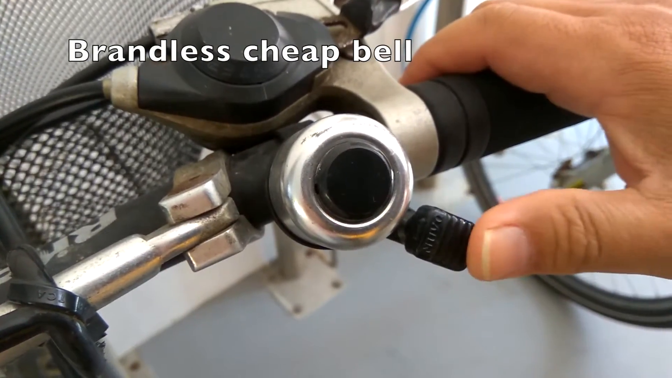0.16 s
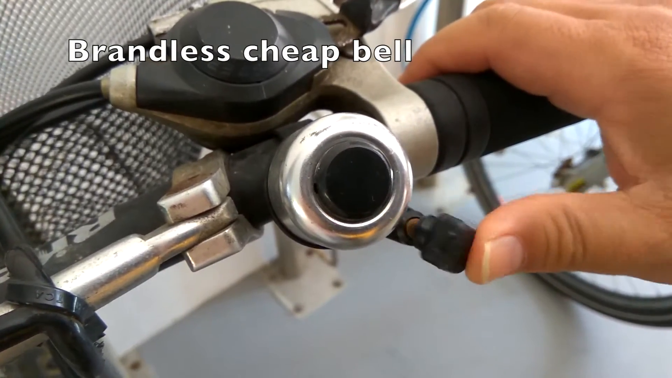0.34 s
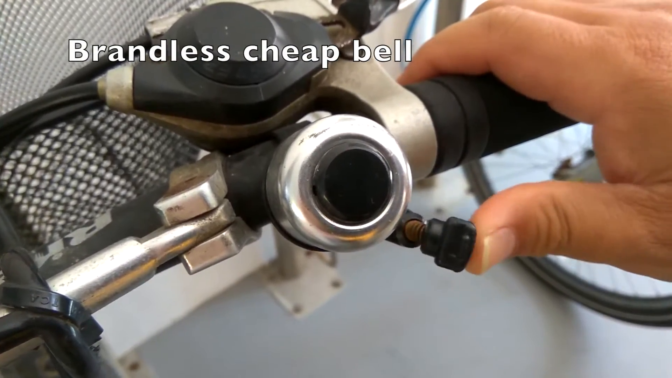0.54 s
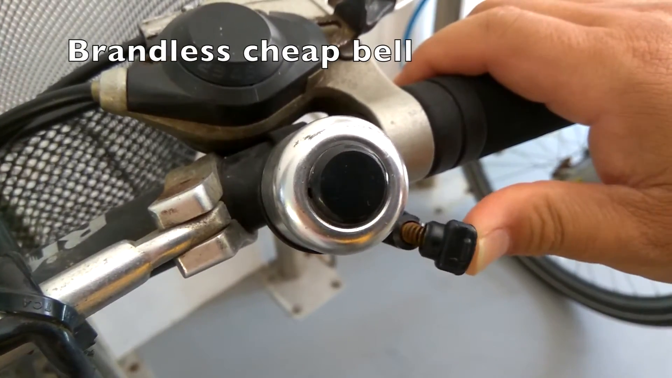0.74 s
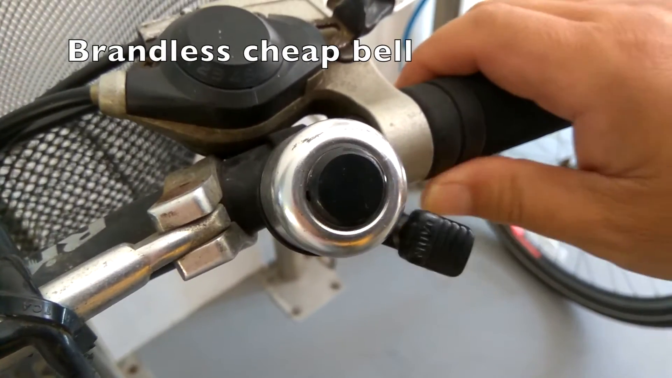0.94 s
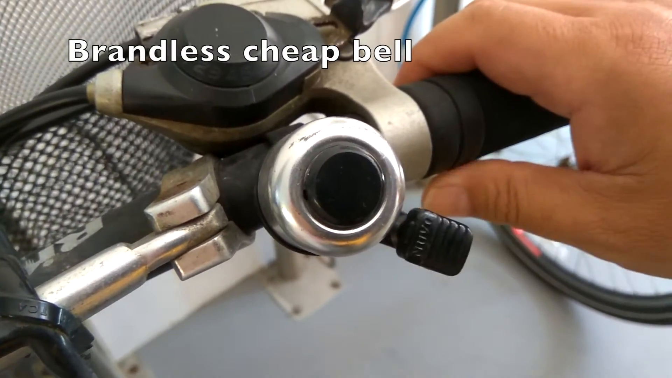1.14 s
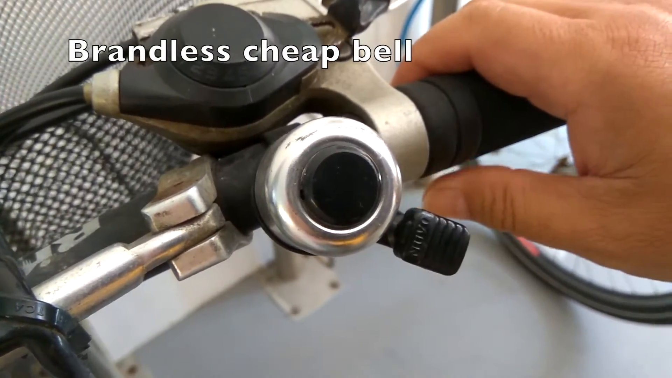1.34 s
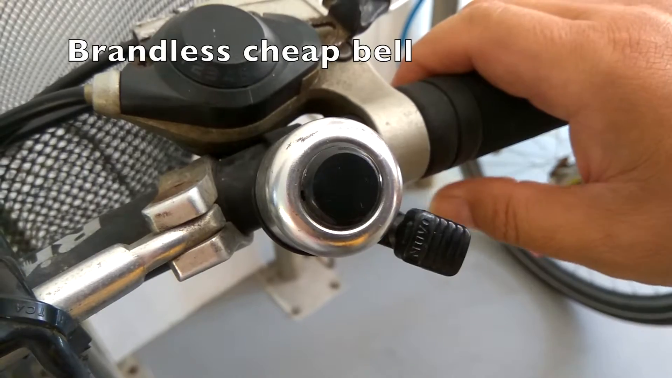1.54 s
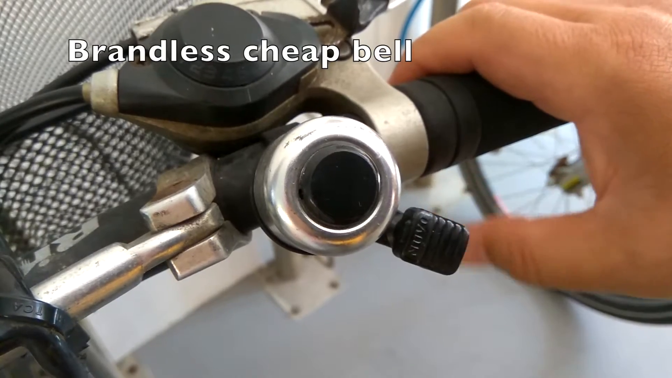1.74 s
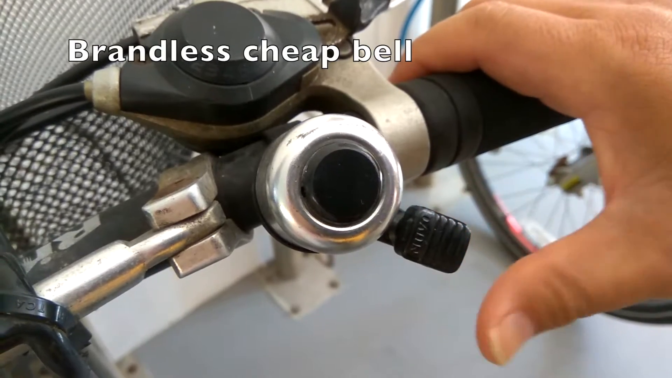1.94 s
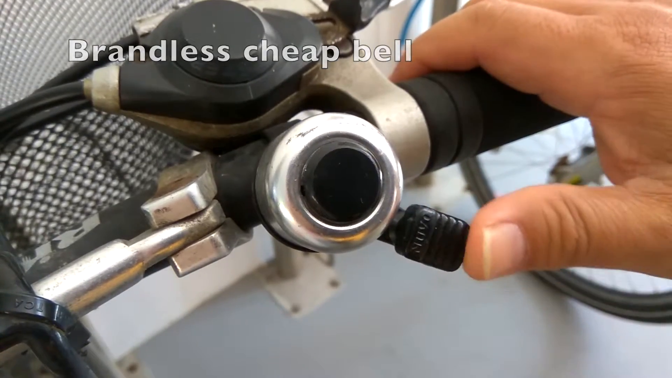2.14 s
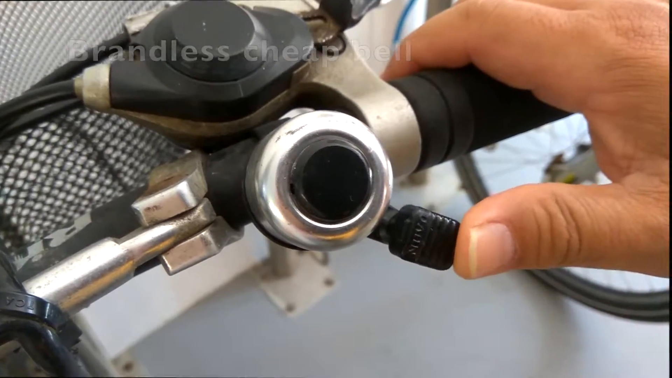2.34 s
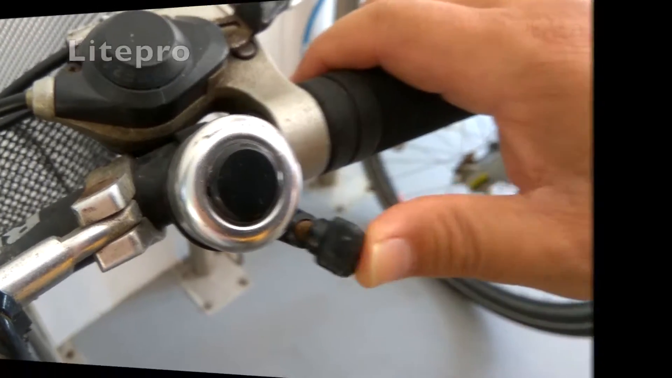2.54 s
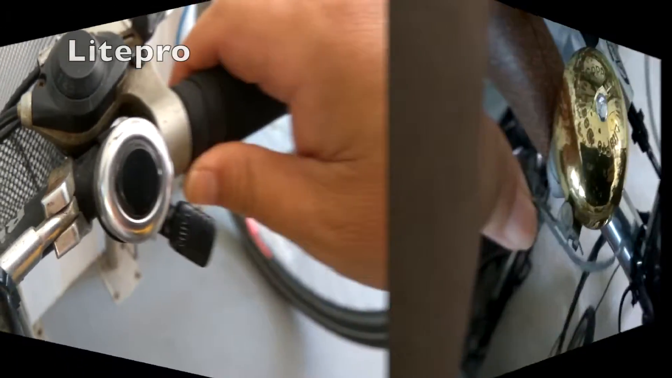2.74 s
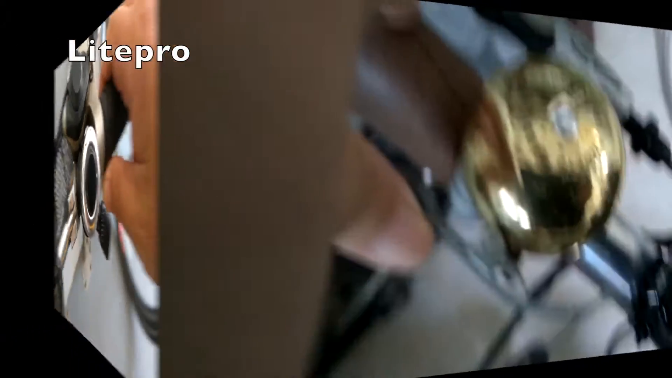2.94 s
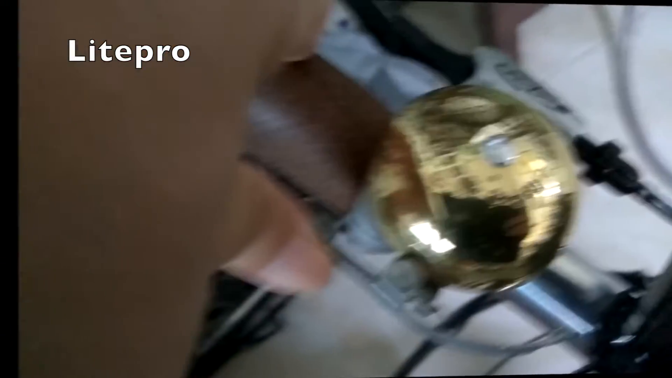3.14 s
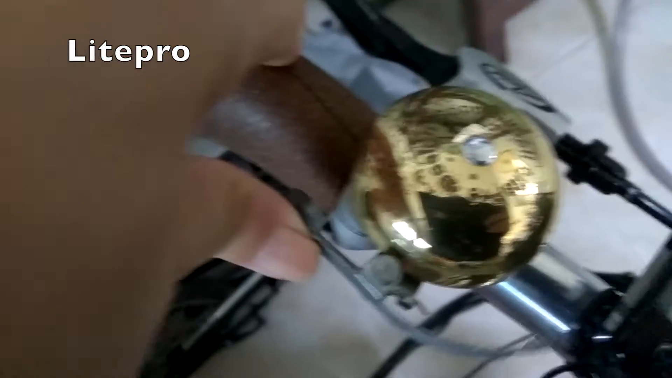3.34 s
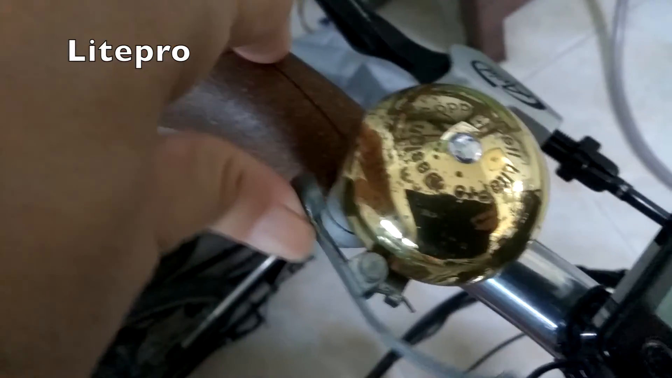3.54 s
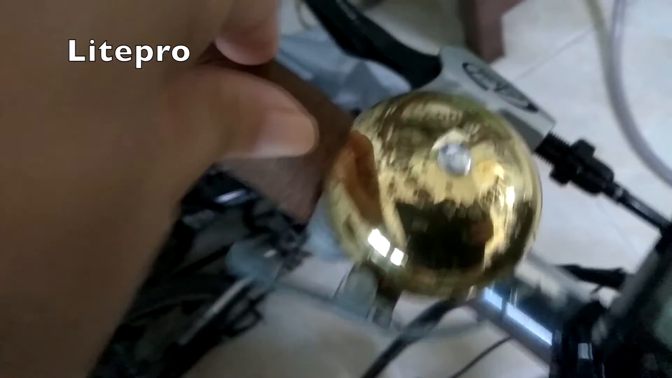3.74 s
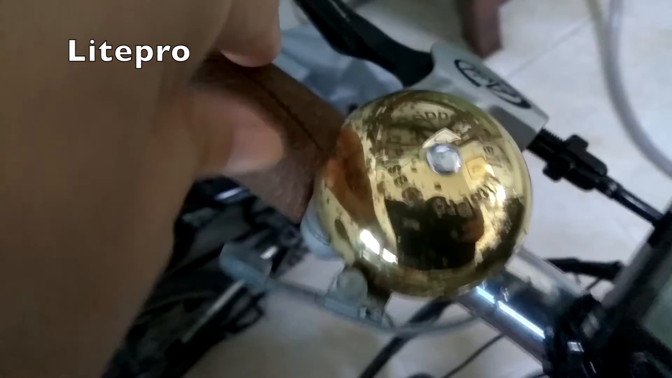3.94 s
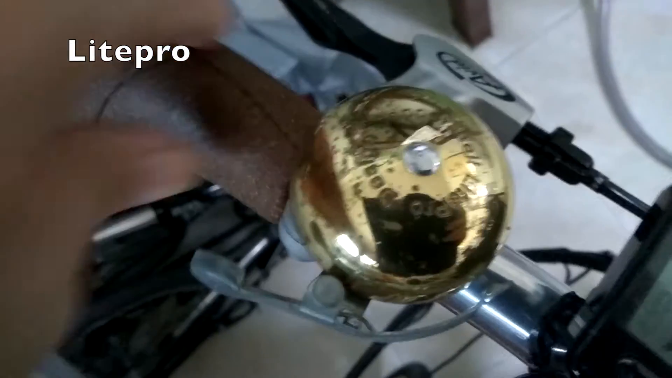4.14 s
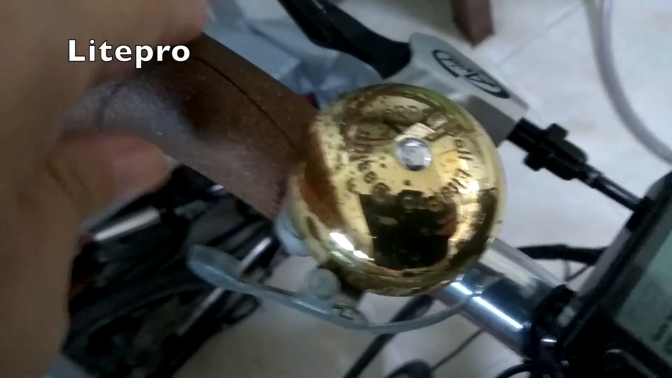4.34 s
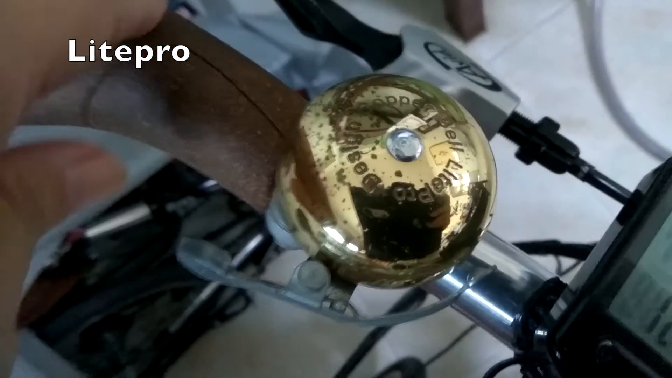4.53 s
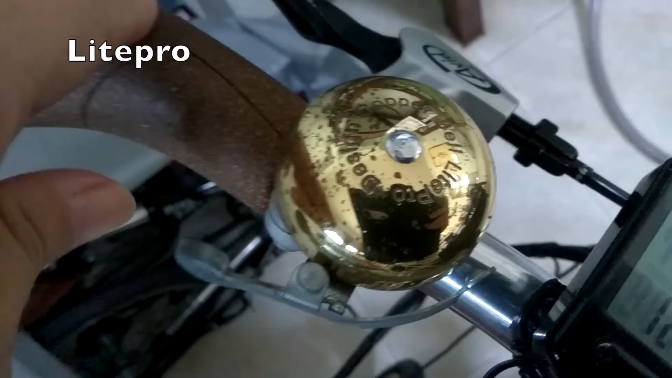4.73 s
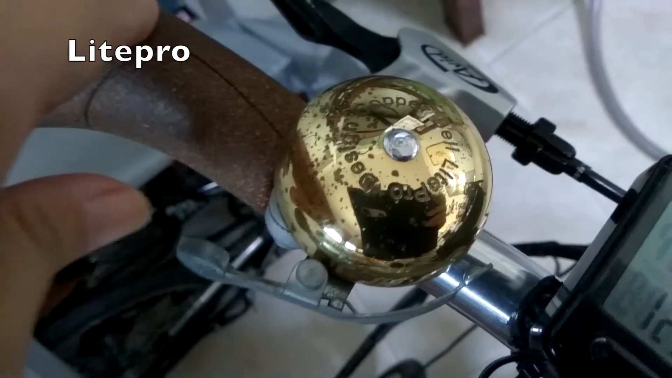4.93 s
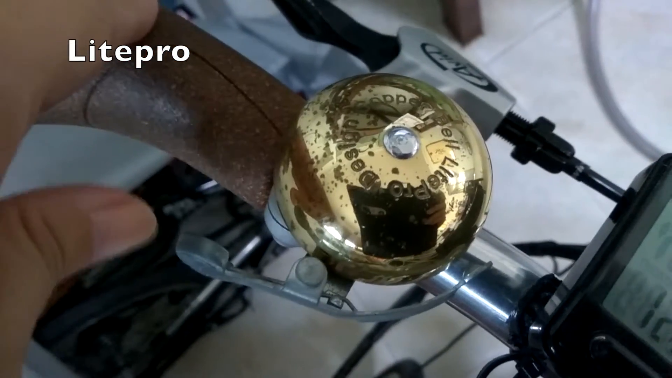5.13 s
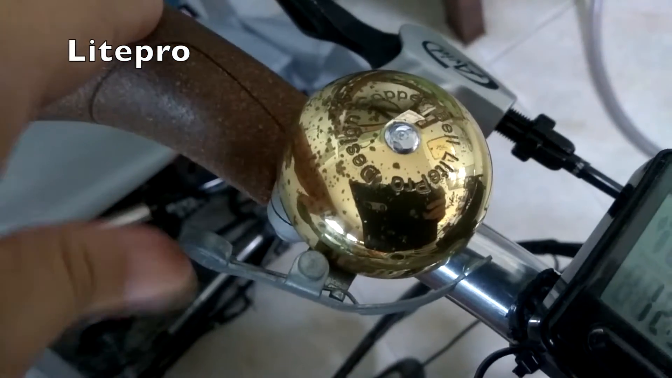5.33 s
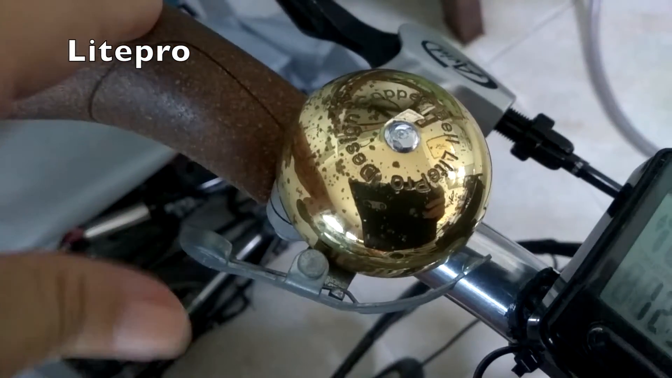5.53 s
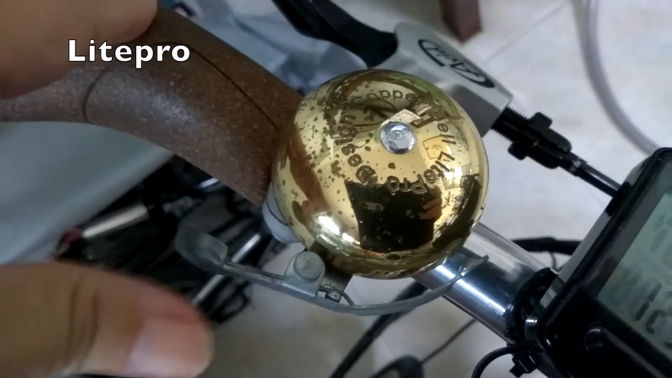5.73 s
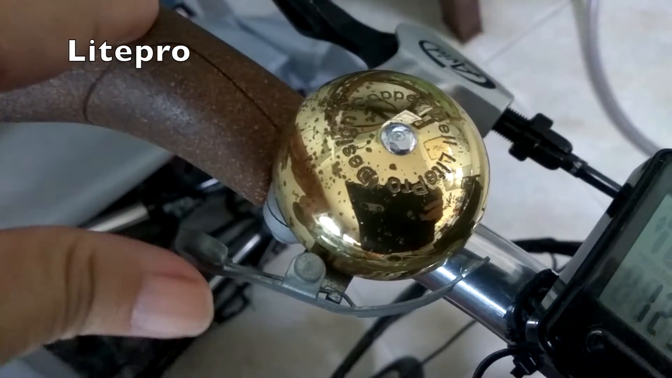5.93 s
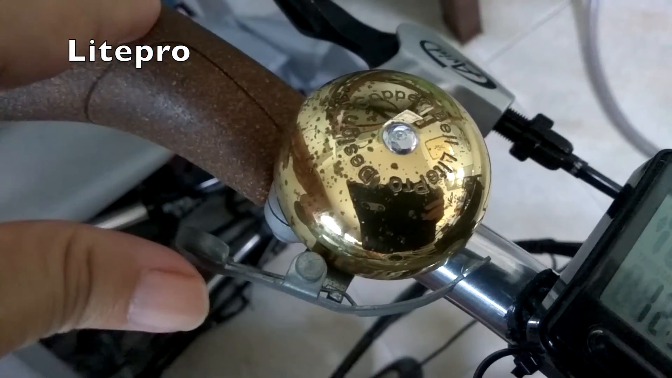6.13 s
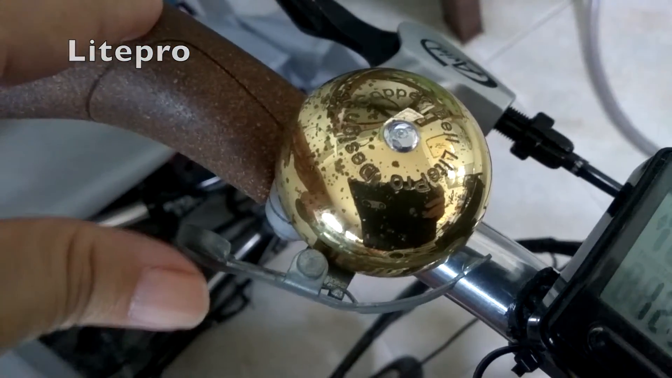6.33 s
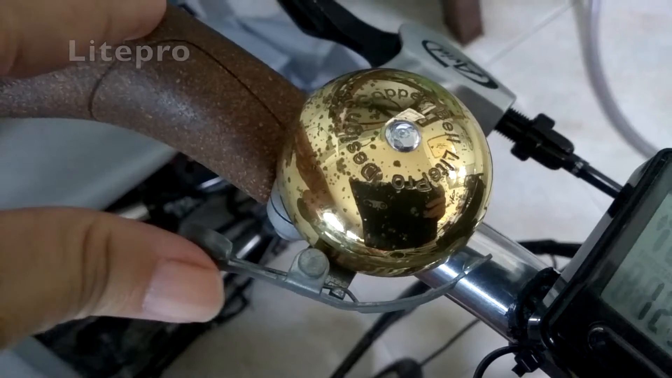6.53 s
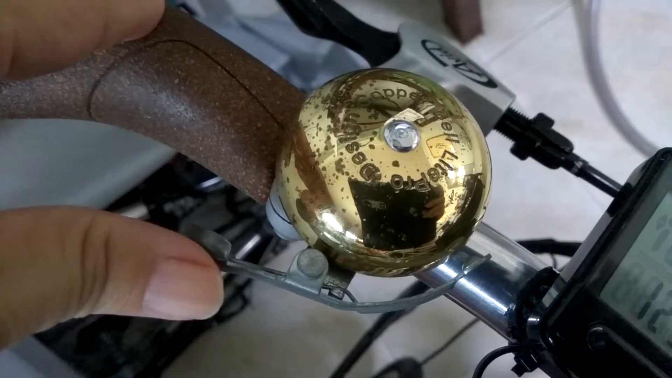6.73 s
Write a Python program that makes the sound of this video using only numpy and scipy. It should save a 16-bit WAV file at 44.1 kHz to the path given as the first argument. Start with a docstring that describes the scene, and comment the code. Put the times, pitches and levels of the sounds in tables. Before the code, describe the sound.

Very close stereo microphone in a quiet room with low hum and faint hiss. A faint leftover ring is stilled, then a small steel bell gives a hard, bright, buzzing ding with a plastic click. A second ding follows and fades under soft grip bumps. A larger brass bell is then struck once by a squeaky wire lever, loud and slightly distorted, and rings on with slow beating to the end.

```python
"""Two bicycle bells up close

In a quiet room with a low hum, a small steel bell is flicked twice and fades out; then a larger brass
bell is struck once and rings on, beating. Each dome is a set of decaying twin tones, with noise and
short tones for buzz, clatter and knock. Both overload the microphone's converter, which adds rough
sum and difference tones until the ring has sunk. Lever clicks, soft thuds and steady noise surround them."""
import sys
import numpy as np
from scipy import signal
from scipy.fft import rfft, irfft, next_fast_len
from scipy.io import wavfile

SR = 44100
rng = np.random.default_rng(int(sys.argv[2]) if len(sys.argv) > 2 else 0)


def to_wav(s):
    """Save 16-bit WAV."""
    ch = np.atleast_2d(s).T  # columns
    pcm = np.round(np.clip(ch, -1, 1) * 32767)  # PCM
    wavfile.write(sys.argv[1], SR, pcm.astype(np.int16))


N = 298998

# All levels in the tables are set ahead of the fades, port balances and overload applied later.
# Dome modes: close twins that beat; each port hears the nulls at its own moment.
# Columns: pitch_hz, t60_s, beat_hz, left_db, right_db, left_twin_share (0-1), right_twin_share (0-1),
# left_first_null_s, right_first_null_s (both after the blow), left_lead_cycles
STEEL_MODES = [(3242, 1.685, 2.95, -8, 2.5, 0.4, 0.14, 0.39, 0.31, 0.11),
               (8374, 0.63, 8.5, 2.5, 9.5, 0.2, 0.17, 0.09, 0.093, 0.34),
               (15330, 0.18, 8.6, -16, -16, 0.7, 1, 0.061, 0.067, 0.34)]
BRASS_MODES = [(1682.5, 15.1, 8.182, -27.6, -23.5, .27, .135, -.002, .038, .33),
               (4321, 8.4, 4.6, -8, -18.5, .04, .33, .099, .082, .15),
               (7626, 3.7, 2.617, 0.9, -5.2, .62, .43, .342, .282, .31),
               (11464, 1.4, 2.2, -6, -12, .45, .5, .2, .27, -.03),
               (15809, .25, 6, -14, -14, .3, .3, .09, .1, .25),
               (20648, .3, 5, -10, -18, .2, .2, .1, .1, .2)]
# Blows on each dome. Columns: start_s, ring_db, buzz_db, clatter_db, knock_db
STEEL_STRIKES = [(0.9366, -2, -23, -14, -19.5), (2.7178, -1.5, -25.5, -8.5, -30)]
BRASS_STRIKES = [(3.7368, 0.003, -8.5, -12.5, -24.5)]
# Short tones at each blow, some of the mount, some rough difference tones of the overload.
# Columns: pitch_hz, level_db, t60_s
STEEL_KNOCK_TONES = [(355, -10, 0.1), (991, 5.5, .14), (1356, -3, 0.2), (4220, 4.5, 0.12),
                     (5410, 5.5, 0.099), (6210, 7, 0.22)]
BRASS_KNOCK_TONES = [(62, -6, .2), (557, 3, .38), (945, 0, .1), (2780, 3, .1), (3904, 5, .12),
                     (5396, 7, .4)]
# Buzz of the striker and its spring. Columns: frequency_hz, density_db (per Hz)
STEEL_BUZZ = [(100, -29), (400, -18), (1800, -5.5), (3000, -14.5), (4100, -24.5), (5500, 2), (7400, 3),
              (8350, 2.5), (9600, -5), (12000, -13), (16000, -25.5)]
BRASS_BUZZ = [(60, -17), (300, -17.5), (800, -8.5), (2200, -11), (4000, -2), (6000, -6), (8000, -2),
              (12000, -12.5), (16000, -0.5)]
# Faint tones of the steel dome as it ticks on every second cycle.
# Columns: multiple (of its lowest mode), level_db, start_s, t60_s
CHATTER_TONES = [(.5, -39.5, 1.17, 0.86), (1.5, -34.5, 1.16, 0.58), (2.5, -42, 1.2, 1),
                 (2, -16.5, 1.052, 0.74), (4, -38, 1.04, 0.664), (2, -17, 2.8, 1)]
# Faint sum tones of the brass dome. Columns: pitch_hz, level_db, t60_s
SUM_TONES = [(3367, -51, 6.7), (6020, -43.5, 6), (9370, -41.5, 1.6), (11800, -48, 1.8)]
# The blow jolts the bar and remixes the twins of the strongest brass mode; rows are left and right port.
# Columns: twin_gain (factor), beat_shift_cycles, rise_db
BAR_JOLT = [(.1, -.23, 2.5), (2.9, 0.41, 2)]
# Clicks of the thumb levers. Columns: start_s, level_db, t60_s
LEVER_CLICKS = [(0.8053, -38, 0.019), (2.315, -40.5, .04), (2.6041, -68, .02), (2.6899, -22.5, 0.035),
                (0.9307, -12, 0.015), (1.111, -34.5, 0.051), (2.7115, -20.5, 0.082), (3.7289, -31, .04),
                (4.464, -41, 0.037)]
# The hand bumps the grip. Columns: start_s, level_db (before a shared 4 dB lift), t60_s, corner_hz
GRIP_BUMPS = [(3.128, -31.5, 0.082, 900), (3.149, -29, 0.17, 260), (3.622, -36, 0.2, 70),
              (4.079, -32, 0.21, 55), (4.386, -32, .15, 90), (4.455, -33.5, 0.083, 300)]
# The hiss swells as the thumb moves onto the lever. Columns: start_s, level_db, t60_s
THUMB_RUSTLES = [(.16, -43, 0.81), (2.39, -40, 0.46)]
# Swells of the low hum. Columns: centre_s, rise_db
HUM_SWELLS = [(.12, 11.5), (2.4, 12)]
# Machine lines around the large bell. Columns: pitch_hz, level_db (rms)
DRONE_LINES = [(52.8, -48), (47.7, -57.5), (202, -60), (400, -65)]
# Noise colours: lever click, hollow wash, hiss, rumble, air. Columns: frequency_hz, density_db (per Hz)
CLICK_COLOUR = [(100, -20.5), (800, -17), (2200, 3), (3600, -10), (5300, 1.5), (8000, -10.5), (12000, -25),
                (16000, -21.5)]
WASH_COLOUR = [(500, -37.5), (850, -11), (1100, -6), (1240, 1.5), (1340, -28), (1800, -51)]
HISS_COLOUR = [(1500, -7.5), (3000, -7), (5500, -4.5), (7800, -4), (9500, -18), (13000, -25.5),
               (16000, -21.5)]
RUMBLE_COLOUR = [(20, -19.5), (40, 0), (65, 3.5), (110, 1), (200, -2.5), (320, -8.5), (700, -44)]
AIR_COLOUR = [(100, -16), (280, 0.5), (600, -1), (1200, -6.5), (2500, -11), (5000, -22.5), (12000, -40.5)]
# Squeak of the wire lever, then three slow control wobbles. Columns: frequency_hz, density_db (per Hz)
SQUEAK_COLOUR = [(9000, -29.5), (12000, -9.5), (12600, -11.5), (13200, 2.5), (16000, -30.5)]
FLUTTER_COLOUR = [(8, 0), (30, -4), (70, -15), (250, -36), (1000, -110)]
DRIFT_COLOUR = [(1, 0), (3, -6), (10, -100)]
WAVER_COLOUR = [(4, 8.0), (12, -7), (30, -100)]

CONVERTER_HZ, TOP_HZ = 48000, 15750  # overload sample rate; band limit
FADE_START_S, FADE_END_S = 2.486, 3.388  # small bell and its background give way
STEEL_DB = 0.5  # output gain of the small bell
SHADE_LEFT_DB, SHADE_RIGHT_DB, SHADE_S = -11, -3.5, 0.49  # the striking hand shades the brass dome
JOLT_S, STRONGEST_SWELL_S = 0.45, 0.018  # settling of the bar; swell of the strongest brass mode
DIFFERENCE_DB, DIFFERENCE_T60_S, DIFFERENCE_ATTACK_S = -25, 0.5, 0.12
WASH_START_S, WASH_DB, WASH_ATTACK_S, WASH_T60_S = 1.19, -34.5, 0.099, 1.3
HUM_HZ, HUM_DB, HUM_SWELL_S = 59.3, -48, 0.24  # resting level; half width of the swells
RUMBLE_DRIFT_DB, RUMBLE_FOLLOWS = 1.4, 0.16  # rms of the slow drift; share of the hum's swells it takes
RUSTLE_ATTACK_S = 0.05


def amp(db):
    """Turn decibels into gain."""
    return 10 ** (np.asarray(db) / 20)


def clock():
    """Give the time of each sample in seconds."""
    return np.arange(N) / SR


def spin(cycles):
    """Turn a phase in cycles into a rotating complex unit."""
    return np.exp(2j * np.pi * cycles)


def tone(hz):
    """A steady sine wave."""
    return np.sin(2 * np.pi * hz * clock())


def filtered(x, response):
    """Shape x with a gain that depends on frequency."""
    size = next_fast_len(N + SR // 4)
    frequency_hz = np.fft.rfftfreq(size, 1 / SR)
    return irfft(rfft(x, size) * response(frequency_hz), size)[..., :N]


def noise(colour, side_db):
    """Stereo noise of rms 1 with a given colour; side_db sets its width."""
    hz, db = np.transpose(colour)
    white = rng.standard_normal((2, N))
    mid, side = filtered(white, lambda f: amp(np.interp(np.log(f + 1), np.log(hz), db)))
    pair = np.array([mid + amp(side_db) * side, mid - amp(side_db) * side])
    return pair / pair.std()


def decay(start, t60, attack):
    """A quick rise and an exponential fall of 60 dB in t60 seconds."""
    age = np.maximum(clock() - start, 0)
    rise = 1 - np.exp(-age / attack)
    return rise * np.exp(-np.log(1000) * np.minimum(age / t60, 20))


def fade():
    """A smooth fall from 1 to 0 between the two bells."""
    progress = np.clip((clock() - FADE_START_S) / (FADE_END_S - FADE_START_S), 0, 1)
    return np.cos(np.pi / 2 * progress) ** 2


def crossfaded_level(early_db, late_db):
    """Glide from the gain around the small bell to the gain around the large one."""
    return fade() * amp(early_db) + (1 - fade()) * amp(late_db)


def room():
    """Steady rumble, air and hiss with soft swells; a wavering hum gives way to a throbbing drone."""
    t = clock()
    swell_db = sum(db * np.exp(-((t - s) / HUM_SWELL_S) ** 2) for s, db in HUM_SWELLS)

    drift_db = RUMBLE_DRIFT_DB * noise(DRIFT_COLOUR, side_db=-60)
    rumble_motion = amp(drift_db + RUMBLE_FOLLOWS * swell_db)
    out = crossfaded_level(-47, -52.5) * rumble_motion * noise(RUMBLE_COLOUR, side_db=-18)
    out += crossfaded_level(-53, -51) * noise(AIR_COLOUR, side_db=-4.5)

    rustle = sum(amp(db) * decay(s, t60, attack=RUSTLE_ATTACK_S) for s, db, t60 in THUMB_RUSTLES)
    out += (crossfaded_level(-50, -59) + rustle) * noise(HISS_COLOUR, side_db=1.5)

    # A soft hollow rush after the first ding.
    wash_shape = decay(WASH_START_S, WASH_T60_S, attack=WASH_ATTACK_S)
    out += amp(WASH_DB) * wash_shape * noise(WASH_COLOUR, side_db=-0.5)

    waver = 0.5 * noise(WAVER_COLOUR, side_db=-21)  # phase in radians
    hum = np.sqrt(2) * np.sin(2 * np.pi * HUM_HZ * t + waver) * amp(HUM_DB + swell_db)
    drone = np.zeros(N)
    for hz, db in DRONE_LINES:
        drone += np.sqrt(2) * amp(db) * np.sin(2 * np.pi * (hz * t + rng.random()))
    return out + fade() * hum + (1 - fade()) * drone


def handling():
    """Levers click as sharp noise bursts; the hand bumps the grip with dull, low-passed thuds."""
    click_shape = sum(amp(db) * decay(s, t60, attack=0.0003) for s, db, t60 in LEVER_CLICKS)
    out = noise(CLICK_COLOUR, side_db=-3.5) * click_shape
    for s, db, t60, corner_hz in GRIP_BUMPS:
        colour = [(corner_hz / 4, -6), (corner_hz, 0), (corner_hz * 4, -22), (20000, -55)]
        out += amp(db + 4) * noise(colour, side_db=1.5) * decay(s, t60, attack=0.008)
    return out


def dome(modes, start, twin_gain=(1, 1), shift=(0, 0)):
    """One complex stereo ring per mode: twins a few hertz apart beat, in a mix that each port can alter."""
    age, rings = clock() - start, []
    for hz, t60, beat, left_db, right_db, left_twin, right_twin, left_null, right_null, lead in modes:
        left_beat = 1 - left_twin * twin_gain[0] * spin(beat * (age - left_null) + shift[0])
        right_beat = 1 - right_twin * twin_gain[1] * spin(beat * (age - right_null) + shift[1])
        ports = np.array([amp(left_db) * left_beat * spin(lead), amp(right_db) * right_beat])
        rings.append(ports * spin(hz * age + rng.random()) * decay(start, t60, attack=0.0013))
    return rings


def knock(tones, start):
    """Plain decaying sine tones that start together at a blow."""
    out = np.zeros(N)
    for hz, db, t60 in tones:
        out += amp(db) * decay(start, t60, attack=0.0011) * np.sin(2 * np.pi * hz * (clock() - start))
    return out


def clatter(colour, start, t60, count):
    """Spring, lever and screw ring briefly in many small modes, unlike at the two ports."""
    hz, db = np.transpose(colour)
    age = np.arange(SR // 2) / SR
    pitch = np.interp(np.arange(count) + rng.random(count), [0, count], [1100, TOP_HZ])
    level_db = np.interp(pitch, hz, db) + 4 * rng.standard_normal((2, count))
    size = amp(level_db) * rng.choice([-1, 1], (2, count))
    life = t60 * np.exp(0.45 * rng.standard_normal((count, 1)))
    rings = np.sin(2 * np.pi * pitch[:, None] * age) * np.exp(-np.log(1000) * age / life)
    out = np.zeros((2, N))
    first = round(start * SR)
    out[:, first:first + len(age)] = 2 * size @ rings / np.linalg.norm(size)
    return out


def overload(x, top, bias, hardness):
    """The converter flattens peaks, a little lopsidedly; the highest overtones fold back down."""
    def squash(v):
        return v / (1 + np.abs(v / top) ** hardness) ** (1 / hardness)
    fast = signal.resample_poly(x, CONVERTER_HZ, SR, axis=-1, window=('kaiser', 2))
    flattened = squash(fast + bias) - squash(bias)
    return signal.resample_poly(flattened, SR, CONVERTER_HZ, axis=-1)[:, :N]


def chatter():
    """As the dings sink, multiples and half multiples of the lowest mode swell over a difference tone."""
    low_hz, bright_hz = STEEL_MODES[0][0], STEEL_MODES[1][0]
    tones = np.zeros(N)
    for multiple, db, s, t60 in CHATTER_TONES:
        tones += amp(db) * tone(multiple * low_hz) * decay(s, t60, attack=0.025)
    swells = sum(decay(s, DIFFERENCE_T60_S, attack=DIFFERENCE_ATTACK_S) for s, *_ in STEEL_STRIKES)
    difference = amp(DIFFERENCE_DB) * swells * tone(3 * low_hz - bright_hz)
    return amp([[-7], [0]]) * tones + difference  # left, right


def small_bell():
    """A sprung plastic hammer cracks on the steel dome; the loose dome buzzes, its bright mode flutters."""
    out = np.zeros((2, N))
    buzz = noise(STEEL_BUZZ, side_db=-1.0)
    flutter = 1 + np.array([[0.5], [0.1]]) * noise(FLUTTER_COLOUR, side_db=0)  # deeper on the left
    for s, db, buzz_db, clatter_db, knock_db in STEEL_STRIKES:
        low, bright, high = dome(STEEL_MODES, s)
        out += amp(db) * (low + bright * flutter + high).real
        buzz_shape = decay(s, 0.92, attack=0.0011) + 4 * decay(s, 0.026, attack=0.0003)
        out += amp(buzz_db) * buzz * buzz_shape
        out += amp(clatter_db) * clatter(STEEL_BUZZ, s, t60=0.18, count=60)
        out += amp(knock_db) * amp([[-9], [2]]) * knock(STEEL_KNOCK_TONES, s)  # left, right
    return overload(out, top=0.65, bias=0.062, hardness=27)


def large_bell():
    """The wire lever squeaks off its catch and strikes the brass dome; hand draws back, bar settles."""
    out = np.zeros((2, N))
    low, middle, strongest, *upper = BRASS_MODES
    twin_gain, shift, jolt_db = np.transpose(BAR_JOLT)[:, :, None]
    for s, db, buzz_db, clatter_db, knock_db in BRASS_STRIKES:
        age = np.maximum(clock() - s, 0)
        hand = np.exp(-(age / SHADE_S) ** 3)
        jolt = np.exp(-(age / JOLT_S) ** 2)
        shade = amp([SHADE_LEFT_DB * hand, SHADE_RIGHT_DB * hand])
        ring = shade * sum(dome([low, middle, *upper], s))

        # Until the bar settles, the strongest mode's twins reach the ports in another mix.
        swell = amp(jolt_db * jolt ** 2) * (1 - np.exp(-age / STRONGEST_SWELL_S))
        ring += swell * dome([strongest], s, 1 + (twin_gain - 1) * jolt, shift * jolt)[0]
        out += amp(db) * ring.real + knock(SUM_TONES, s)

        out += amp(buzz_db) * noise(BRASS_BUZZ, side_db=-8.5) * decay(s, 0.12, attack=0.00094)
        out += amp(clatter_db) * clatter(BRASS_BUZZ, s, t60=0.3, count=70)
        out += amp(knock_db) * knock(BRASS_KNOCK_TONES, s)
        squeak = noise(SQUEAK_COLOUR, side_db=7.0) * decay(s - 0.005, 0.068, attack=0.0018)
        out += amp([[-4], [-16]]) * squeak  # left, right
    return overload(out, top=0.77, bias=0.024, hardness=30)


def scene():
    """The small bell, still faintly ringing until the thumb stills it, fades out before the large one."""
    thumb = np.clip(1 - clock() / 0.35, 0, 1)
    earlier_ring = dome(STEEL_MODES, start=-1.25)[0].real * thumb
    small = amp(STEEL_DB) * fade() * (earlier_ring + small_bell() + chatter())
    return room() + handling() + small + large_bell()


def record(dry):
    """The microphone path drops the deepest bass and everything above its band limit."""
    def response(hz):
        bass_cut = hz ** 4 / (hz ** 4 + 32 ** 4)
        return bass_cut / (1 + (hz / TOP_HZ) ** 200)
    return filtered(dry, response)


dry = scene()
out = record(dry)
to_wav(out)
```